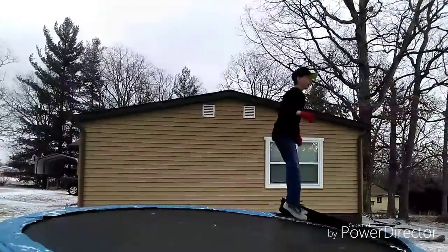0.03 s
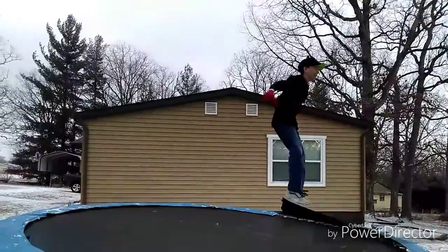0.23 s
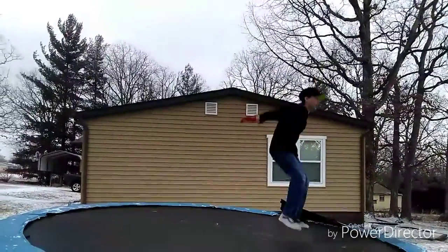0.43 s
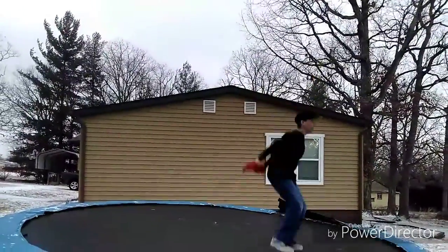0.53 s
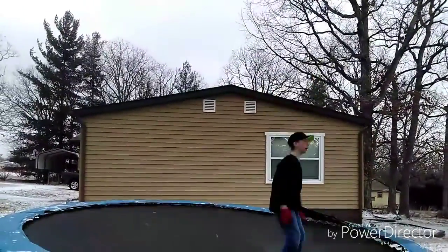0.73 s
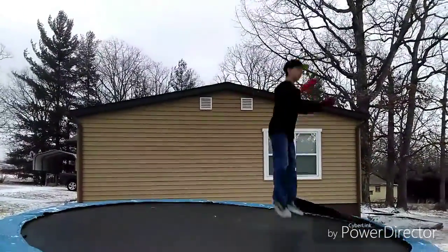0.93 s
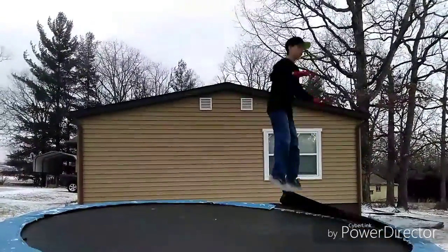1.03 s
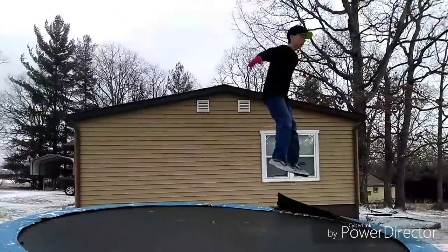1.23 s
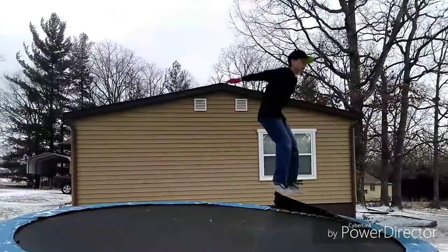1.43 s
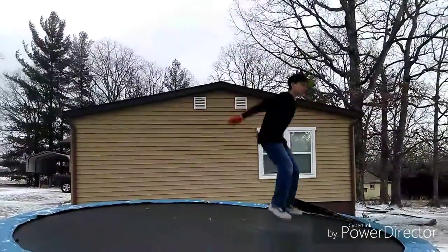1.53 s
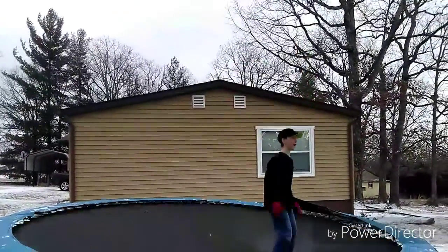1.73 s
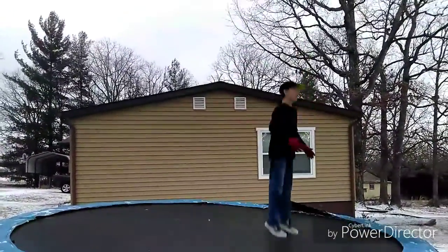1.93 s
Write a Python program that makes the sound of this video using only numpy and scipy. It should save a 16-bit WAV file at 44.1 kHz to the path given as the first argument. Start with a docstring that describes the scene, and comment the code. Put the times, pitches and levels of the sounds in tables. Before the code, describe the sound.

Trampoline springs rasp and jangle as someone bounces outdoors. One bright creak dies away, then two more follow about a second apart, each with a dull mat thud and frame knocks. Faint puffs of air brush the microphone.

```python
"""The steel springs of a garden trampoline rasp as someone bounces, about once every 1.1 s.
As they stretch and let go, stick-slip friction at the hooks excites the modes of coils and tubes.
Each landing thuds on the mat, a heavily damped membrane, and the frame knocks under the load.
The winter day is still; between the bounces a puff of air buffets the microphone."""
import sys
import numpy as np
from scipy import signal
from scipy.fft import rfft, irfft
from scipy.io import wavfile

SR = 44100
rng = np.random.default_rng(int(sys.argv[2]) if len(sys.argv) > 2 else 0)


def generate_wav(signal):
    """Clip the signal to [-1, 1] and save it as 16-bit WAV at the path in sys.argv[1]."""
    frames = np.transpose(np.atleast_2d(signal))
    scaled = np.clip(frames, -1, 1) * 32767
    pcm = np.round(scaled).astype(np.int16)
    wavfile.write(sys.argv[1], SR, pcm)


N = 88200
TIME = np.arange(N) / SR
RING_SAMPLES = 16384  # length of an impulse response

# Correlation of left and right: f/Hz, coefficient (-1 to 1)
CORRELATION = [(100, 1), (400, 0.48), (750, 0.83), (1200, 0.11), (2500, -0.05), (4500, -0.097),
               (8000, 0.085)]


def from_db(db):
    """Amplitude ratio: a factor of ten per 20 dB."""
    return 10 ** (np.asarray(db) / 20)


def pan(db):
    """Interaural level difference: gains that put left db above right."""
    return from_db(np.array([[db], [-db]]) / 2)


def at_bins(points, size=N):
    """Interpolation of a table at each FFT bin, on a log frequency axis."""
    hz, value = np.transpose(points)
    return np.interp(np.log(np.arange(size // 2 + 1) * SR / size + 1), np.log(hz), value)


def decay(t60, size=RING_SAMPLES):
    """Exponential damping: 60 dB in t60 seconds."""
    return np.exp(-np.log(1000) * TIME[:size] / t60)


def unit_energy(x):
    """Normalisation of each channel to an energy of 1."""
    return x / np.sqrt(np.sum(x ** 2, axis=-1, keepdims=True) + 1e-20)


def stereo_spectrum(correlation, size):
    """Partial coherence: white noise spectra mixed from a common and an opposed part."""
    mid, side = rfft(rng.standard_normal((2, size)))
    return np.sqrt(1 + correlation) * mid + np.sqrt(1 - correlation) * side * [[1], [-1]]


def noise(spectrum, correlation):
    """Spectral shaping: coloured stereo noise of rms 1."""
    x = irfft(from_db(at_bins(spectrum)) * stereo_spectrum(correlation, N), N)
    return x / x.std()


def burst(start, spectrum, t60):
    """An impact transient: noise that starts at once and decays exponentially."""
    envelope = np.interp(TIME - start, TIME, decay(t60, N), left=0)
    return envelope * noise(spectrum, at_bins(CORRELATION))


def slips(length, per_second=1600, edge_s=0.0026):
    """Stick-slip friction: a run of randomly timed clicks with a mean power of 1."""
    age = TIME[:RING_SAMPLES]
    gate = np.clip(np.minimum(age, length - age) / edge_s + 0.5, 0, 1)
    clicks = rng.random(RING_SAMPLES) < per_second / SR
    polarity = rng.choice([-1, 1], RING_SAMPLES)
    return unit_energy(gate * clicks * polarity) * np.sqrt(length * SR)


def ring(modes, spread_cycles):
    """Modal superposition: damped sines, each shifted at random in phase at either ear."""
    response = np.zeros((2, RING_SAMPLES))
    for k, (hz, db, t60) in enumerate(modes):
        cycles = hz * TIME[:RING_SAMPLES] + spread_cycles * rng.uniform(-1, 1, (2, 1))
        response += (-1) ** k * from_db(db) * decay(t60) * np.sin(2 * np.pi * cycles)
    return unit_energy(response)


def excite(out, start, clicks, response):
    """Convolution: each click adds the body's impulse response to out."""
    sound = signal.fftconvolve(clicks[None], response, axes=1)
    first = int(start * SR)
    out[:, first:first + sound.shape[1]] += sound[:, :N - first]


def chatter(start, length, db, body):
    """Repeated impact: a loose joint drives a body, with energy proportional to duration."""
    out = np.zeros((2, N))
    excite(out, start, slips(length), body)
    return from_db(db) * np.sqrt(length * SR) * unit_energy(out)


def garden():
    """Stationary ambient noise: a faint, even hiss."""
    # Ambient spectrum: f/Hz, relative level/dB
    spectrum = [(25, -10.5), (70, 1), (200, -1.5), (400, -5.5), (1000, -11.5), (2200, -12), (4500, -16),
                (8000, -11), (12000, -22.5), (16000, -39)]
    return from_db(-68.5) * noise(spectrum, at_bins(CORRELATION))


def air():
    """Turbulence: pressure fluctuations at the microphone make a low rumble."""
    # Course of the gusts: t/s, level/dB, left minus right/dB
    gusts = [(0, -73, 9.5), (0.281, -71.5, -4), (.45, -59.5, 5), (.6, -77.5, 3), (.74, -54.5, -4),
             (.8, -54.5, 0), (.93, -42.5, -1), (1.02, -65, 0), (1.09, -66, 0), (1.14, -46, 1.5),
             (1.29, -65, 2), (1.32, -52, 10.5), (1.41, -42, 10), (1.45, -44, 9.5), (1.484, -35, -1.5),
             (1.53, -51, -3.5), (1.585, -46, 13.5), (1.68, -51.5, -3), (1.83, -52.5, -5.5),
             (1.91, -43.5, -20), (2, -38.5, 0)]
    # Rumble spectrum: f/Hz, relative level/dB
    spectrum = [(20, -30.5), (38, -11), (60, 3.5), (85, -5.5), (140, -12), (220, -25), (400, -46.5),
                (1000, -74.5)]
    times, db, pan_db = np.transpose(gusts)
    envelope = from_db([np.interp(TIME, times, db + side * pan_db / 2) for side in (1, -1)])
    return envelope * noise(spectrum, correlation=0.63)


def tubes():
    """Resonance: as the load changes, each hollow tube clanks on its own note."""
    # Clanks: t/s, duration/s, level/dB, main note f/Hz
    clanks = [(.02, 0.062, -49.5, 827), (.175, 0.018, -35.5, 635), (.76, 0.036, -43.5, 722),
              (.978, 0.0059, -28.5, 912), (1.118, 0.0066, -33, 704), (1.776, 0.021, -54.5, 615),
              (1.85, 0.02, -47, 800)]
    # Tube modes: ratio to main note, relative level/dB, T60/s
    modes = [(.6, -12.5, 0.17), (1, 1, 0.085), (1.66, -9, 0.088), (2.7, -5, .1)]
    out = np.zeros((2, N))
    for start, length, db, hz in clanks:
        tuned = [(hz * ratio, mode_db, t60) for ratio, mode_db, t60 in modes]
        out += chatter(start, length, db, ring(tuned, spread_cycles=0.3))
    return out


def frame():
    """Normal modes: every knock excites the same low resonances of the whole frame."""
    # Knocks: t/s, duration/s, level/dB
    knocks = [(0.636, 0.0047, -46), (0.756, 0.019, -49.5), (0.844, 0.037, -30), (1.116, 0.0304, -43),
              (1.729, 0.014, -37.5), (1.933, 0.0133, -28)]
    # Frame modes: f/Hz, relative level/dB, T60/s
    modes = [(178, 3, .07), (232, -2, 0.11), (282.4, -1.5, 0.12), (333, -3.5, 0.12), (410, -1, 0.039),
             (509, -7.5, 0.02), (650, -6, 0.063), (800, -16, 0.11)]
    body = ring(modes, spread_cycles=0.04)
    return sum(chatter(start, length, db, body) for start, length, db in knocks)


def mat():
    """A damped membrane: thuds swell and die in a few cycles; soles slap and the cover snaps."""
    # Thuds at landing and full stretch: t/s, envelope peak level/dB, f/Hz, time constant/s
    thuds = [(0.642, -25.5, 114, 0.0019), (.655, -41.5, 70, .005), (0.851, -30.5, 97.6, 0.0075),
             (1.19, -41.5, 61, 0.0054), (1.734, -32.5, 93.5, 0.0046), (1.933, -18.5, 140, 0.0027)]
    # Slaps of the soles: t/s, level/dB
    slaps = [(0.642, -51.5), (1.735, -46)]
    # Dull slap spectrum: f/Hz, relative level/dB
    slap_spectrum = [(100, -14.5), (250, 2), (500, -6.5), (750, -2), (1100, -14), (2000, -23),
                     (5000, -33.5)]
    # Snaps of mat and cover: t/s, level/dB, left minus right/dB
    snaps = [(0.418, -50, 10), (1.737, -28.5, 1.5)]
    # Bright snap spectrum: f/Hz, relative level/dB
    snap_spectrum = [(800, 2.5), (2000, -32), (4500, -16), (7000, -6), (9500, 6.5), (12000, -15),
                     (15500, -4.5)]
    out = np.zeros((2, N))
    for start, db, hz, tau in thuds:
        age = np.maximum(TIME - start, 0)
        envelope = (age / (2 * tau)) ** 2 * np.exp(2 - age / tau)  # peaks at 2 tau
        out += from_db(db) * envelope * np.sin(2 * np.pi * hz * age)
    for start, db in slaps:
        out += from_db(db) * burst(start, slap_spectrum, t60=0.1)
    for start, db, pan_db in snaps:
        out += from_db(db) * pan(pan_db) * burst(start, snap_spectrum, t60=0.024)
    return out


def steel(spectrum, t60, tail_db, mode_spacing_hz=20):
    """High modal density: randomly scattered modes tick, crack and ring on after an impulse."""
    gain = from_db(at_bins(spectrum, RING_SAMPLES))
    is_mode = rng.random(len(gain)) < SR / RING_SAMPLES / mode_spacing_hz
    correlation = at_bins(CORRELATION, RING_SAMPLES)
    tones = irfft(gain * is_mode * stereo_spectrum(correlation, RING_SAMPLES))
    tick = from_db(5) * decay(t60=0.0014)
    crack = decay(t60=0.035)
    tail = from_db(tail_db) * decay(t60)
    return unit_energy(tones * (tick + crack + tail))


def springs():
    """Stick-slip excitation: each spring's hook drives its bright coil and the duller hook and tube."""
    # Rasps of the hooks: t/s, duration/s, zing level/dB, clatter level/dB
    rasps = [(0, 0.039, -23.5, -31.5), (0.049, 0.056, -37.5, -39), (0.176, 0.016, -36, -34.5),
             (0.185, 0.012, -35, -29.5), (0.356, 0.14, -69, -70.5), (0.698, 0.061, -37, -38.5),
             (0.753, 0.021, -19.5, -24), (0.772, 0.0058, -11.5, -20.5), (0.78, 0.015, -17.5, -24.5),
             (0.795, 0.034, -23, -32.5), (0.846, 0.0462, -27, -28), (0.908, .035, -38.5, -36),
             (0.953, 0.028, -25, -34), (0.976, 0.021, -25, -25), (1.005, 0.039, -29, -36.5),
             (1.068, .034, -48, -42), (1.101, 0.022, -34, -31.5), (1.115, 0.038, -37.5, -35.5),
             (1.173, 0.019, -53, -42.5), (1.239, 0.026, -75.5, -56), (1.463, 0.0088, -93, -60.5),
             (1.726, 0.1, -54.5, -56), (1.82, 0.015, -35.5, -36), (1.832, 0.018, -24.5, -28.5),
             (1.849, 0.017, -19.5, -23), (1.873, 0.0069, -13.5, -23.5), (1.887, 0.016, -18.5, -29),
             (1.908, 0.036, -53, -35), (1.932, 0.016, -26.5, -23.5), (1.969, .04, -37.5, -35)]
    # Dense modes of the coils: f/Hz, relative level/dB
    zing_spectrum = [(2500, -27), (3500, -12), (4600, -10.5), (5700, -14.5), (6600, -4.5), (7400, 0),
                     (8700, -6.5), (10300, -13), (12000, -20), (15500, -25)]
    # Dense modes of hook and tube: f/Hz, relative level/dB
    clatter_spectrum = [(200, -42.5), (380, -19), (510, -23.5), (650, -11), (880, -2), (1200, -6.5),
                        (1750, 3), (2300, 0), (3000, -2.5), (3700, -13.5), (6000, -18.5), (12000, -32)]
    # Clearest notes of the coils: f/Hz, relative level/dB
    coil_modes = [(6586, -10), (7397, -14), (7455, 10), (8052, 3), (8872, -1)]
    note_t60 = 0.17
    notes = from_db(-20) * ring([(hz, db, note_t60) for hz, db in coil_modes], spread_cycles=0.29)
    out = np.zeros((2, N))
    for start, length, zing_db, clatter_db in rasps:
        zing = from_db(zing_db) * pan(-0.5) * (steel(zing_spectrum, t60=0.25, tail_db=-5.5) + notes)
        clatter = from_db(clatter_db) * pan(-0.54) * steel(clatter_spectrum, t60=0.3, tail_db=-9.5)
        excite(out, start, slips(length), zing + clatter)
    return out


def scene():
    """Superposition in the open air; the springs and tubes carry no bass below about 340 Hz."""
    low_cut = signal.butter(4, 340, "high", fs=SR, output="sos")
    thin_steel = signal.sosfilt(low_cut, springs() + tubes())
    return thin_steel + frame() + mat() + air() + garden()


def record(dry, cutoff_hz=15500):
    """Band limiting: a steep elliptic low-pass removes the highest treble."""
    return signal.sosfilt(signal.ellip(10, 0.3, 80, cutoff_hz, fs=SR, output="sos"), dry)


dry = scene()
out = record(dry)
generate_wav(out)
```